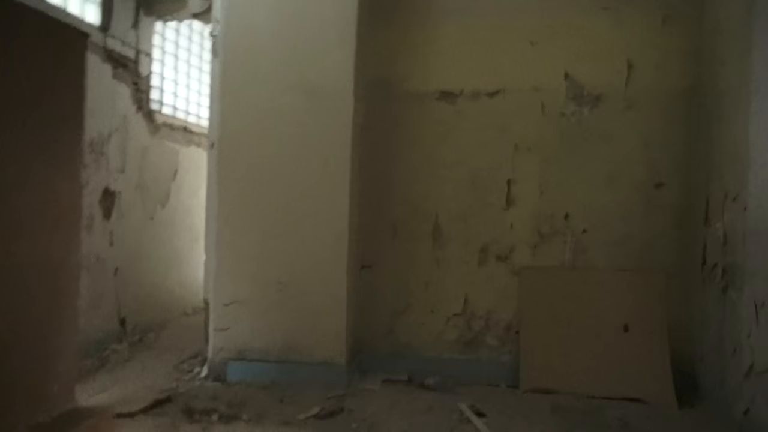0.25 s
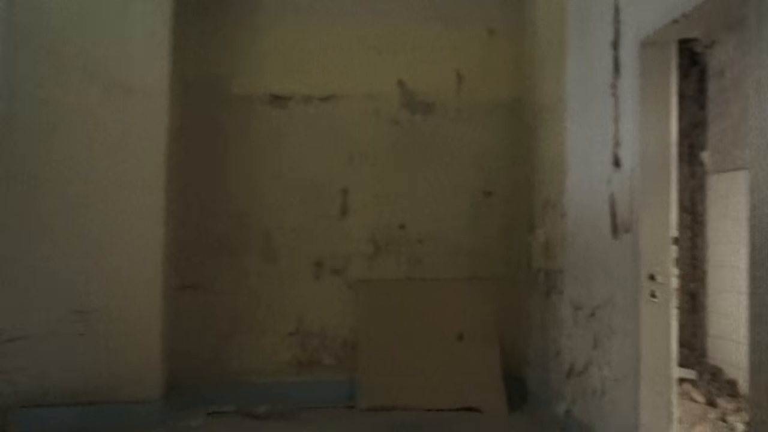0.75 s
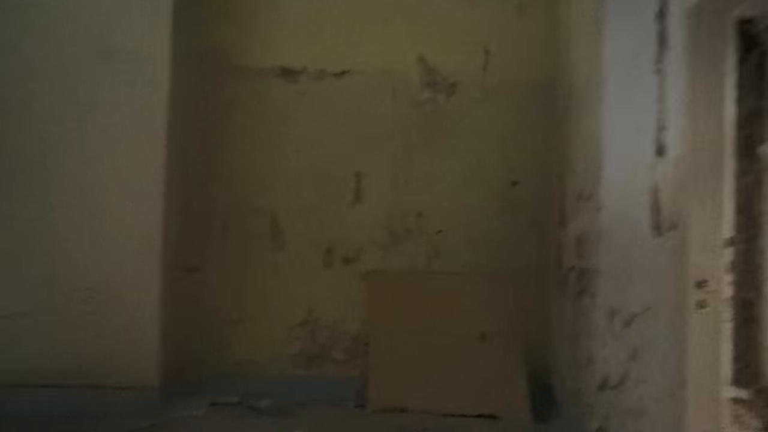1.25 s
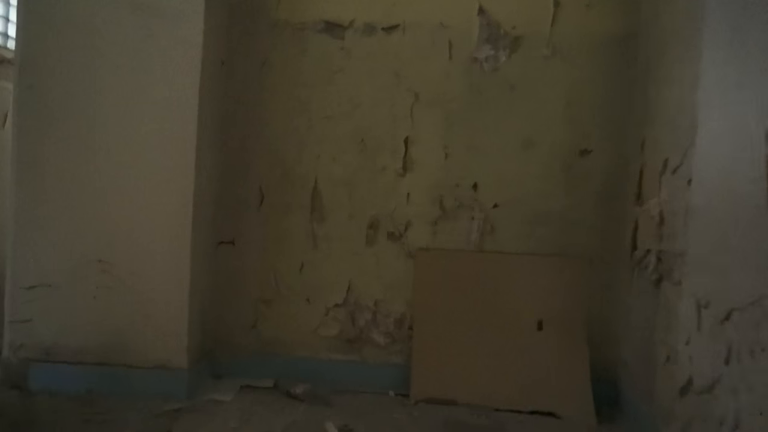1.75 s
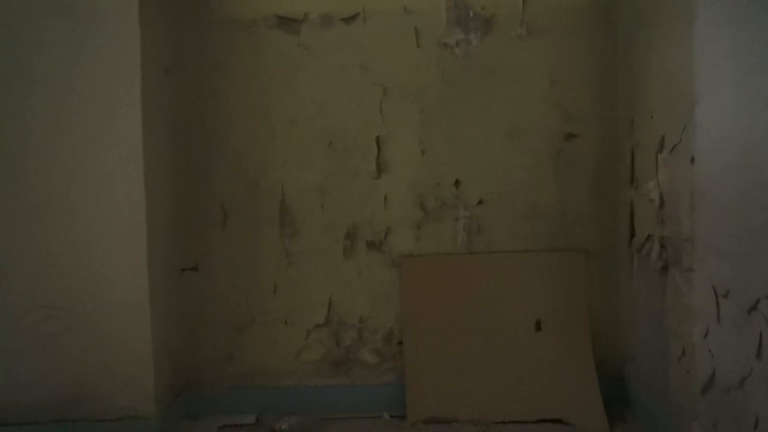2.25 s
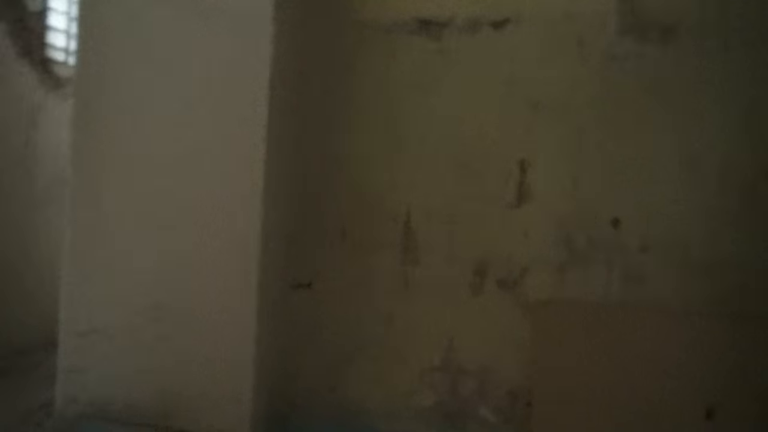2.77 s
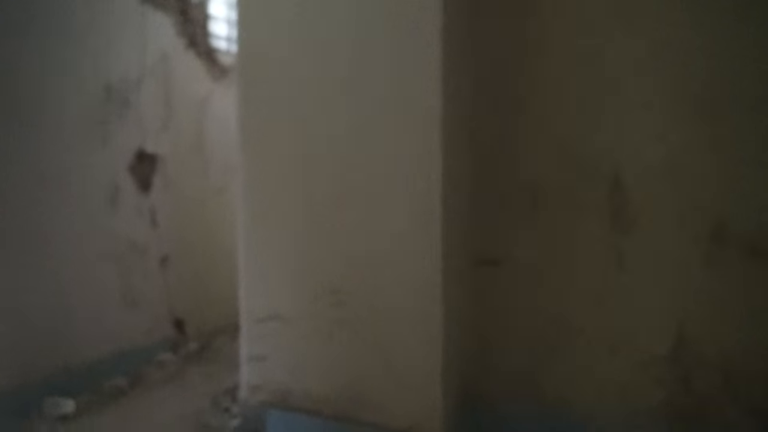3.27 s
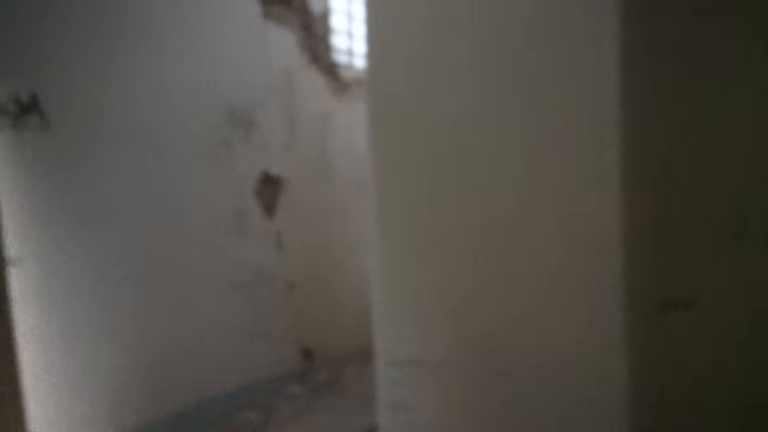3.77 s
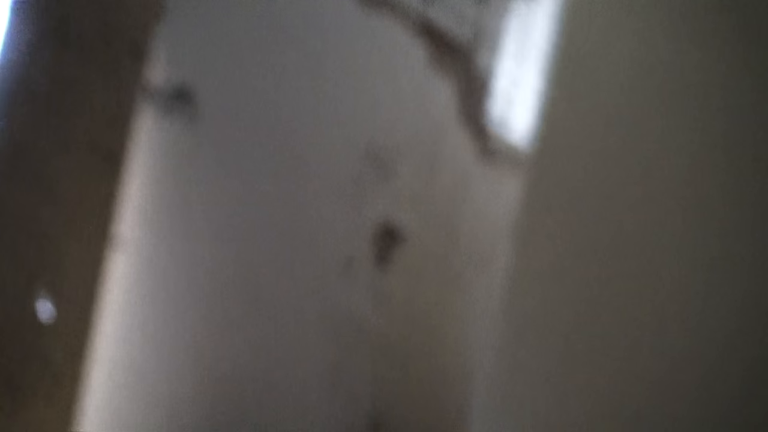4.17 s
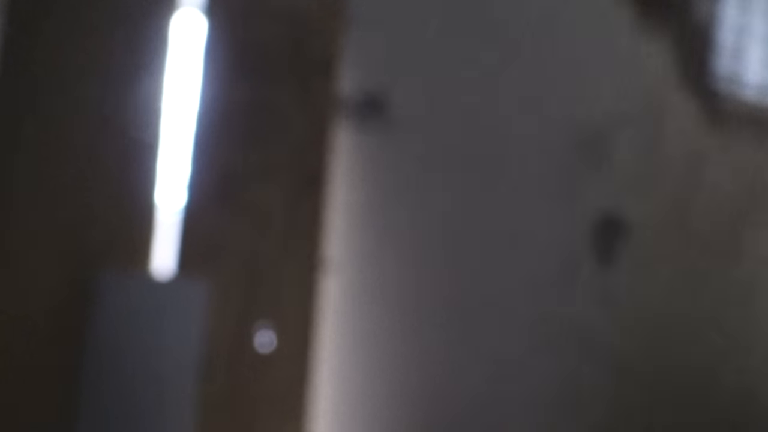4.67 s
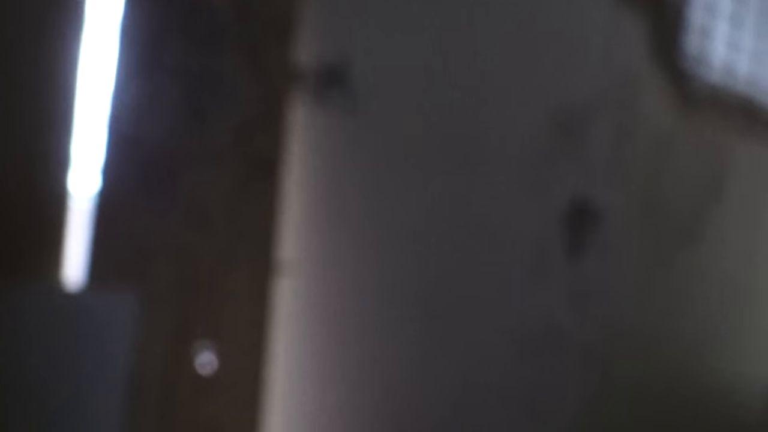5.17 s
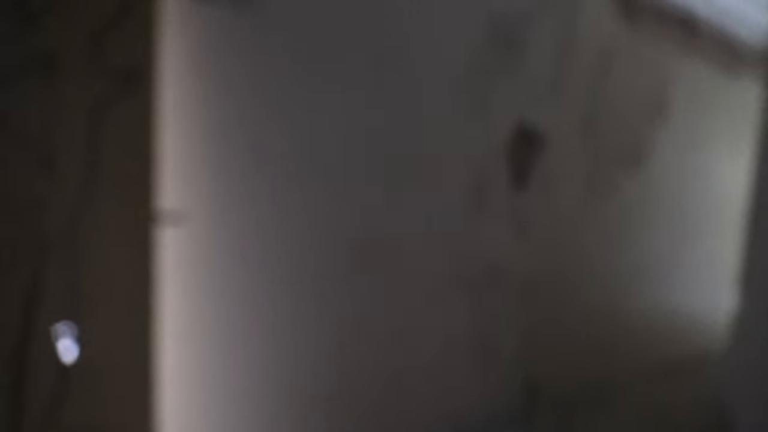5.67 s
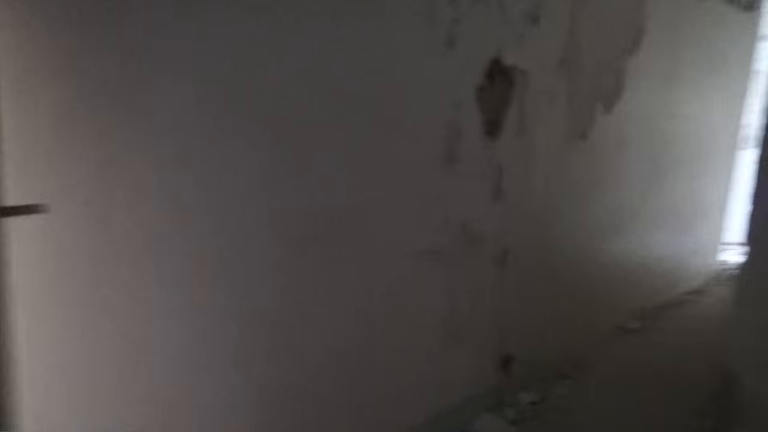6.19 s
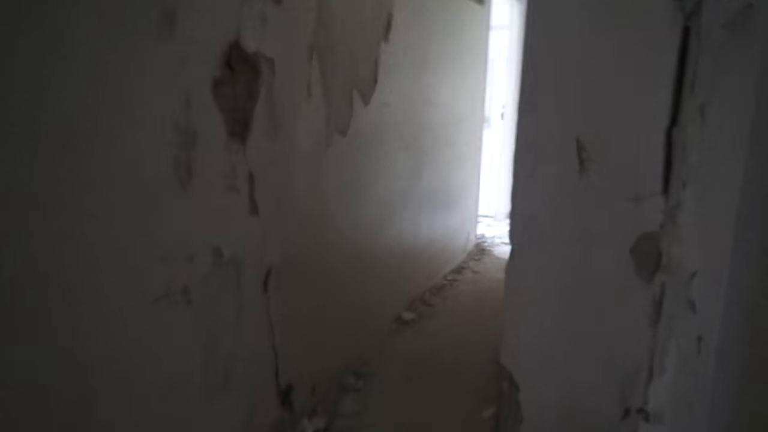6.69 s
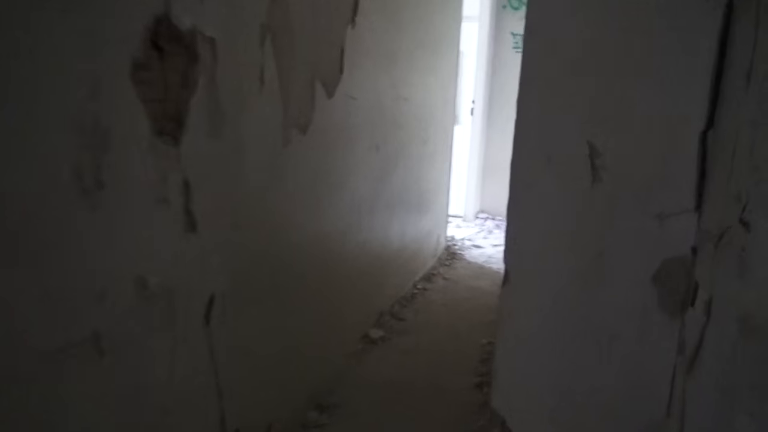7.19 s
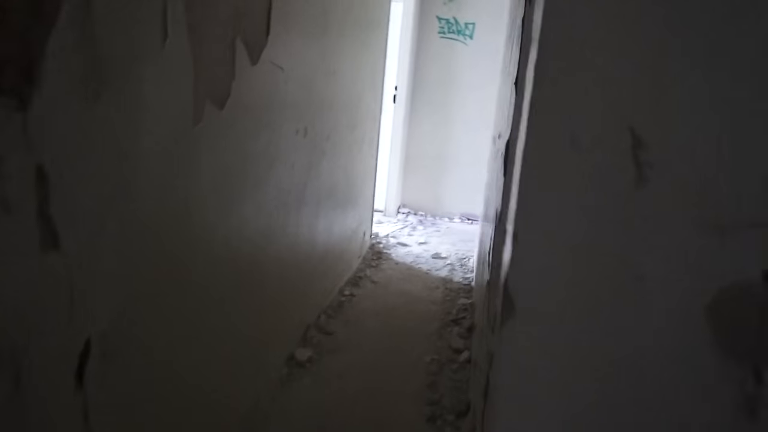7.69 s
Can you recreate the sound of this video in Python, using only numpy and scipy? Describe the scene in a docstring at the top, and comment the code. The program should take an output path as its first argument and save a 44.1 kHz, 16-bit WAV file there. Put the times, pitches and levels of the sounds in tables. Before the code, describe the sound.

Slow footsteps cross plaster rubble in an empty building, with a short echo from bare walls, soft clothing rustle and a faint hiss. A scuffing step opens, followed by light crunches and small snaps around 1, 1.7 and 2.5 seconds. A loud, dry plastic click on the camera body sounds right at the microphone at 1.9 seconds, with two smaller ones just before 3. At about 3.4 seconds a sole crushes plaster in the loudest burst of cracking, then crackles and slides over sand from 4 to 4.3. Quieter steps and tiny ticks follow, until another loud camera click at 5.9 seconds. Gritty steps and scrapes run from 6 to 6.8 seconds, when a foot knocks a hollow piece that rocks for a moment. A last soft crunch comes around 7.6 seconds.

```python
"""Slow steps over rubble

A person with a small camera walks slowly over plaster rubble and grit in an empty building.
Soles thud, scuff and crush grit, pieces snap, a foot knocks a hollow piece, and clothes rustle.
Bare walls echo the floor sounds, while ticks on the camera body stay close and nearly dry."""
import sys
import numpy as np
from scipy import signal
from scipy.fft import rfft, irfft, next_fast_len
from scipy.io import wavfile

SR = 44100
rng = np.random.default_rng(int(sys.argv[2]) if len(sys.argv) > 2 else 0)


def to_wav(sig):
    """Store sig (one row per channel, or 1-D mono) as 16-bit WAV at the path in sys.argv[1].

    Samples outside -1..1 are clipped; the rate is SR.
    """
    pcm = np.clip(np.atleast_2d(sig), -1, 1) * 32767
    pcm = np.round(pcm).astype(np.int16)
    wavfile.write(sys.argv[1], SR, pcm.T)  # frames by channels


N = 350418

# a sole presses on the rubble: (peak time [s], rise [s], time from peak to lift [s], base fade [dB/s],
# crunch [dB], scuff [dB], rumble [dB], fine grit [dB])
STEPS = [(0.0, .05, 0.12, 33, -74.5, -88, -76, -65.5), (.143, 0.022, 0.057, 41, -64.5, -60, -78, -58.5),
         (.2, 0.13, .3, 35, -57.5, -58.5, -71.5, -56.5), (.894, 0.29, 0.023, 36.5, -75, -83, -82, -76.5),
         (1.004, 0.057, 0.25, 22.5, -60, -67.5, -73.5, -64),
         (1.439, 0.43, 0.009, 43.5, -68, -76, -73.5, -75), (1.765, 0.13, 0.33, 43, -57, -64, -72.5, -53.5),
         (2.1, 0.1, 0.011, 47, -66.5, -86.5, -70.5, -58),
         (2.283, 0.062, 0.0099, 67, -70.5, -87, -87, -62.5), (2.48, 0.16, 0.025, 20, -68.5, -80, -112, -70),
         (2.546, 0.036, 0.33, 43, -54, -60, -84, -57), (2.79, 0.25, 0.1, 86, -66.5, -74, -73.5, -68.5),
         (2.938, 0.037, 0.014, 46, -79, -68.5, -66.5, -94), (3.135, 0.32, 0.0055, 48, -66, -88, -93, -63.5),
         (3.26, 0.043, 0.091, -5, -68, -53, -60, -62), (3.388, 0.13, 0.38, 83, -44, -52.5, -63.5, -39),
         (3.8, 0.5, 0.088, 13, -65.5, -71.5, -72, -73), (3.938, 0.11, 0.019, 35, -73, -64, -68, -59.5),
         (4.069, 0.0085, 0.014, 38, -55.5, -62.5, -55.5, -62), (4.21, 0.27, 0.3, 59, -55, -69, -66, -52.5),
         (4.6, 0.77, 0.13, 35, -73.5, -99, -91, -70), (4.86, 0.23, 0.32, 46, -63, -67.5, -72, -69),
         (5.34, 0.12, 0.17, 59, -69, -84, -90, -64), (5.597, 0.044, 0.69, 46, -59.5, -59, -70.5, -67.5),
         (6.105, 0.011, 0.13, 34, -61.5, -67, -61.5, -61),
         (6.165, 0.022, 0.255, 11.5, -57.5, -61.5, -66.5, -59),
         (6.465, 0.07, 0.28, 13, -55, -63.5, -68, -58), (6.805, 0.11, 0.018, 56, -50, -59.5, -67, -59),
         (6.856, 0.015, .15, 87, -52, -46.5, -77, -69), (7.309, 0.032, 0.24, -3, -75, -77.5, -89, -83.5),
         (7.555, 0.048, 0.071, 53, -52, -56.5, -65.5, -57), (7.661, 0.05, 0.3, 53, -62.5, -63.5, -71, -68)]
# how fast crunch, scuff, rumble and fine grit fade: (multiple of the base fade)
FADE_FACTORS = [1.3, 1.63, 0.73, 1.85]
# what is left of the same four between steps: (level [dB])
REST_DB = [-90.5, -83, -83.5, -100]
# tone of breaking grit: (frequency [Hz], level [dB])
GRIT_TONE = [(410, -38), (700, -15), (1650, 9.5), (1810, 8), (2390, 5.5), (3370, 2), (4170, -2),
             (6390, -10.5), (9000, -18), (11700, -42), (19800, -120)]
# heels landing: (time [s], level [dB], pitch [Hz])
HEELS = [(0.137, -61, 410), (0.18, -43.5, 840), (0.2185, -42.5, 620), (0.241, -47.5, 600),
         (0.972, -54, 304), (1.909, -55.5, 167), (3.04, -61, 196), (3.233, -50.5, 288), (3.28, -57.5, 92),
         (3.822, -48, 456), (4.057, -51.5, 148), (4.1, -58, 62), (4.277, -55, 101), (4.999, -60.5, 74),
         (5.339, -63.5, 172), (5.549, -59.5, 397), (5.577, -47.5, 504), (5.596, -48.5, 490),
         (6.1, -53, 356), (6.348, -48.5, 502)]
# rubble snapping, and a short click at 0.5 s: (time [s], level [dB], pitch [Hz], noise over ring [dB])
SNAPS = [(0.501, -43.5, 1840, -8), (1.009, -45.5, 3100, -19), (1.235, -43, 1680, -29.5),
         (1.728, -38.5, 8100, -18), (1.742, -38.5, 5230, 5), (1.754, -34, 7550, -9), (1.777, -35, 7000, -3),
         (2.095, -47.5, 3100, -2), (2.524, -40, 1050, -21), (2.751, -45, 1870, -3),
         (3.258, -42.5, 1800, -25), (3.272, -34, 3700, -20), (3.283, -31, 5660, -20),
         (3.32, -25.5, 3400, -10), (3.352, -29, 5650, -9), (3.361, -31, 1260, -15),
         (3.387, -16.5, 3200, -4.5), (3.394, -25, 5600, -8), (3.398, -25, 9500, -2),
         (3.4015, -24.5, 3280, -22), (3.4066, -20.5, 6460, -4), (3.413, -25, 6200, -9),
         (3.914, -40.5, 800, 4.5), (3.932, -44, 9000, -10), (3.963, -43, 2000, -10),
         (4.051, -44.5, 1840, 2), (4.069, -34, 1780, 1), (4.09, -37, 1870, -11), (4.104, -38.5, 5040, -2),
         (4.109, -34, 2300, -5), (4.153, -34, 2050, -7), (4.161, -39, 2600, -8), (4.171, -41, 2300, -5),
         (4.188, -39, 2320, -6), (4.197, -40, 2390, -17), (4.278, -36, 1760, 3), (4.331, -39, 1720, -8.5),
         (4.622, -47.5, 2960, -22), (4.932, -46, 2870, -8), (5.63, -41, 2570, -18),
         (5.7265, -45.5, 994, -19), (5.74, -47.5, 950, -19), (6.112, -43.5, 1690, 0),
         (6.159, -37, 3450, -22), (6.213, -36.5, 2720, -5), (6.272, -41, 11400, -25),
         (6.29, -40.5, 1780, -11), (6.397, -48, 2440, -19), (6.457, -37, 2630, -16),
         (6.5074, -32, 2800, -6), (6.519, -37, 2390, -8), (6.751, -35.5, 8500, -25),
         (6.795, -34.5, 1460, -11.5), (6.85, -37, 2400, -14), (7.544, -45, 2270, -10),
         (7.678, -38.5, 6430, 0)]
# a sole slides over sand: (peak time [s], rise [s], fall [s], level [dB])
RASPS = [(2.56, 0.1, 0.099, -55.5), (3.42, 0.079, 0.15, -53), (4.2, 0.075, 0.12, -48.5),
         (5.34, 0.12, 0.12, -60), (6.2, 0.24, 0.33, -61.5), (6.5, 0.2, 0.16, -54.5)]
# chips dragged along the floor: (start [s], end [s], pitch [Hz], level [dB])
SCRAPES = [(-.1, 0.155, 3180, -71.5), (-.1, .15, 4540, -76), (0.868, 0.964, 2400, -81),
           (3.112, 3.155, 1860, -64.5), (3.268, 3.311, 3730, -51), (3.267, 3.306, 5700, -51.5),
           (5.074, 5.266, 1333, -70), (6.45, 6.73, 5500, -61)]
# the hollow piece is knocked and rocks: (time [s], strength [dB])
KNOCKS = [(6.849, -30.5), (6.888, -45), (6.913, -36.5), (6.955, -43.5), (7.0, -53)]
# the hollow piece's tones: (pitch [Hz], level [dB], time to fade by 60 dB [s])
HOLLOW_TONES = [(244.6, -25, 0.2), (252.4, -18, 0.3), (464, -10.5, 0.22), (481, -8.5, 0.19),
                (624, -15, 0.17), (985, -17.5, 0.11), (1029, -15, 0.062), (1190, -12, 0.032),
                (1815, -12.5, 0.041)]
# ticks on the camera: (time [s], level [dB], pitch [Hz], noise over ring [dB], noise centre [Hz],
# ring time [s])
TICKS = [(0.879, -53, 2320, -8, 7000, 0.014), (1.56, -47, 1830, 7, 5900, 0.012),
         (1.672, -47, 1510, -6, 4500, 0.016), (1.678, -47, 7760, -7, 8000, 0.012),
         (1.9096, -14, 5900, 5.5, 10100, 0.015), (2.397, -50, 1810, -30, 7000, 0.035),
         (2.454, -45.5, 2430, -9, 6000, 0.015), (2.771, -28.5, 1850, -2.5, 5100, 0.011),
         (2.898, -59, 6000, 1, 7000, 0.008), (2.917, -58, 7000, 2, 7000, 0.0074),
         (2.97, -22, 1920, -4.5, 2700, 0.016), (3.205, -54, 1780, -20, 5030, .014),
         (3.226, -50, 8840, 3, 8000, 0.008), (3.644, -49, 6960, -3, 8000, 0.008),
         (3.663, -48, 6310, 4, 7500, 0.014), (3.736, -50, 9250, 10, 7500, 0.008),
         (3.756, -47.5, 3270, 4, 6000, 0.008), (3.782, -59, 4500, -8, 6000, .01),
         (3.846, -52, 3320, -7, 7000, 0.0088), (3.99, -53, 1800, -13, 7000, 0.012),
         (4.956, -39.5, 2920, -6.5, 7000, 0.0035), (4.983, -40.5, 1710, -18, 7000, 0.021),
         (5.099, -60, 1480, -12, 7000, 0.015), (5.128, -51.5, 1960, -13.5, 7000, 0.013),
         (5.179, -51, 1500, -7, 7000, 0.012), (5.2, -56, 2720, -2, 7040, 0.012),
         (5.261, -51.5, 1800, -16.5, 6950, 0.014), (5.8847, -13.5, 4900, 8.5, 7300, 0.02),
         (7.042, -55, 2500, -14, 5950, 0.0075), (7.304, -50, 1790, -21, 3450, 0.016),
         (7.319, -55.5, 1790, -33.5, 7100, 0.022)]
# the camera shell's tones: (pitch [Hz], level [dB], ring time [s])
SHELL_TONES = [(1270, -39, 0.022), (1800, -11.5, 0.026), (2630, -30.5, 0.016), (3480, -12.5, 0.016),
               (3940, -21.5, 0.016), (7600, -24.5, 0.019)]
# clothes brushing, and brief bright hiss at a few snaps and ticks:
# (peak time [s], rise [s], fall [s], level [dB])
SWISHES = [(.3, 0.097, 0.28, -52), (.52, 0.058, 0.14, -63.5), (1.405, 0.026, 0.14, -62.5),
           (2.21, 0.1, 0.018, -61.5), (2.35, 0.1, 0.04, -66), (3.33, 0.06, .1, -42),
           (3.655, 0.046, 0.22, -63), (4.28, 0.018, 0.027, -55), (4.78, 0.016, .1, -65.5),
           (4.96, .04, 0.064, -65), (4.825, 0.045, 0.17, -59), (5.635, 0.15, 0.25, -59.5),
           (5.79, .04, 0.095, -64), (5.835, 0.052, .06, -64), (6.6, 0.18, 0.5, -53.5),
           (6.88, 0.13, .1, -63.5), (1.705, 0.027, .04, -68), (7.685, 0.021, 0.088, -55)]
# tone of cloth, fine grit and bright hiss: (frequency [Hz], level [dB])
RUSTLE_TONE = [(2060, -11), (3500, 1.5), (3750, -8), (4370, -2.5), (5900, -1.5), (11500, -5.5),
               (14100, -10.5), (16000, -29)]
# the building's echo: (frequency [Hz], time to fade by 60 dB [s])
HALL_FADE = [(100, 0.43), (500, 1), (2000, 0.76), (6000, 0.73), (14000, 0.3)]
# tone of still air and microphone hiss: (frequency [Hz], level [dB])
AIR_TONE = [(15, -22.5), (25, 8.5), (172, 3.5), (309, -3.5), (952, -2), (1760, 0.5), (2500, -19.5),
            (3090, -3), (3830, -13.5), (7000, -19), (12100, -25.5), (15000, -22.5)]
# stereo width: (frequency [Hz], gain of the side signal [dB])
WIDTH = [(60, -18.5), (130, -14.5), (260, -18), (500, -16), (2000, -21), (4500, -24.5), (7000, -5),
         (10000, -9.5), (14000, -20)]
# stereo balance: (frequency [Hz], left over right [dB])
BALANCE = [(60, 2.4), (250, 1.2), (1000, 0.1), (4000, 0.1), (8000, 1.2)]

SWELL_DB, LIFT_DB_PER_S = 28.5, 220.5   # change over one rise or fall; extra fade once a sole lifts
PATTER_DB, PATTER_FADE_S = -18.5, 0.25
SHELL_DB_PER_OCTAVE = -1.5   # brighter ticks ring the shell less
CRACKLE_S, CRACKLE_S_PER_DB = 0.013, 0.04   # the loudest ticks crackle longest
HALL_DB, AIR_DB = -7.5, -74
ECHO_DB, ECHO_FADE_S = -36, 0.41
TOP_HZ = 16100


def crunch(level_db):
    """Grit grains break one by one, each ringing briefly; the mix of sizes keeps changing."""
    clicks = grains(per_s=2200, uneven_db=3.0)
    grain_size = rng.integers(0, 18, N)
    rings = 0
    for k, hz in enumerate(np.geomspace(800, 8500, 18)):
        share = amp(at_hz(GRIT_TONE, hz) + 3.3 * drift(8.0))
        rings = rings + hz * ring(share * clicks * (grain_size == k), hz, 17.0 / hz)
    return amp(level_db) * unit(rings)


def sole(scuff_db, rumble_db):
    """The sole drags in coarse slips; the weight shifts with a low rumble."""
    scuff = band(grains(per_s=1500, uneven_db=4.0), 382, 1100)
    rumble = band(band(grains(per_s=1300, uneven_db=3.0), 110, 299), 60, 440)
    return amp(scuff_db) * unit(scuff) + amp(rumble_db) * unit(rumble)


def footsteps():
    """Each step swells and fades: four power curves, for crunch, scuff, rumble and fine grit."""
    powers = []
    for k, (factor, rest_db) in enumerate(zip(FADE_FACTORS, REST_DB)):
        steps = sum(amp(levels[k]) ** 2 * swell(peak, rise, factor * fade, lift)
                    for peak, rise, lift, fade, *levels in STEPS)
        powers.append(amp(rest_db) ** 2 + steps)
    return powers


def heels():
    """A soft push rings the floor under the heel for a few cycles."""
    out, push = np.zeros(N), np.pad(np.hanning(60), (0, 6000))
    for s, db, hz in HEELS:
        thump = band(ring(push, hz, min(27.0 / hz, .12)), 51, 2000)
        add(out, s, amp(db) * thump / np.abs(thump).max())
    return out


def plaster_snaps():
    """Plaster breaks and barely rings: one short tone with four random ones around it."""
    out = np.zeros(N)
    noises = rng.standard_normal((len(SNAPS), 1500))
    ratios = rng.uniform(0.6, 1.7, (len(SNAPS), 4))
    for (s, db, hz, noise_db), noise, ratio in zip(SNAPS, noises, ratios):
        tones = [(hz * r, -6, .004) for r in ratio]
        snap = crack(noise, hz, noise_db, np.sqrt(hz * 8000), tones,
                     ring_s=0.0072, crackle_s=0.0072, first_hit=4.0)
        add(out, s, amp(db) * snap)
    return out


def crack(noise, hz, noise_db, noise_hz, extra_tones, ring_s, crackle_s, first_hit):
    """One hit and a burst of smaller ones ring a cluster of tones and spray noise; peak 1."""
    t = np.arange(len(noise)) / SR
    hits = (noise ** 3 + first_hit * (t == 0)) * amp(-60 * np.maximum(t / crackle_s - .12, 0))
    tone = ring(hits, hz, ring_s) + .6 * ring(hits, hz * 1.045, ring_s)
    tone += 0.41 * ring(hits, hz * 1.3, ring_s * 0.65)
    tone += sum(amp(db) * ring(hits, pitch, fade_s) for pitch, db, fade_s in extra_tones)
    tone = band(tone, 780, TOP_HZ)
    spray = noise * amp(-60 * np.maximum(t / crackle_s - .1, 0)) * np.minimum(t / 0.00034, 1)
    spray = band(spray, noise_hz / 2.33, min(noise_hz * 2.33, TOP_HZ))
    sound = tone / np.abs(tone).max() + amp(noise_db) * spray / np.abs(spray).max()
    return sound / np.abs(sound).max()


def sand_rasp():
    """Sand under a sliding sole: dense grains in one band."""
    sand = band(band(grains(per_s=3400, uneven_db=2.0), 2000, 3300), 1800, 3600)
    return amp(level(strokes(RASPS) + 1e-14)) * unit(sand)


def chip_scrapes():
    """Each dragged chip sings in one narrow band."""
    out, t = 0, np.arange(N) / SR
    for start, end, hz, db in SCRAPES:
        progress = np.clip((t - start) / (end - start), 0, 1)
        singing = unit(ring(rng.standard_normal(N), hz, 31.0 / hz))
        out = out + amp(db) * np.sin(np.pi * progress) ** .5 * singing
    return out


def hollow_piece():
    """Each knock, and the grit pattering after it, rings every tone of the piece by a different amount."""
    out, t = np.zeros(N), np.arange(SR // 2) / SR
    chance_db = rng.normal(0, 2.5, (len(KNOCKS), len(HOLLOW_TONES)))
    for k, (hz, tone_db, ring_s) in enumerate(HOLLOW_TONES):
        hits = np.zeros(N)
        for (s, db), extra_db in zip(KNOCKS, chance_db[:, k]):
            patter = amp(PATTER_DB - 60 * t / PATTER_FADE_S) * rng.standard_normal(len(t))
            patter *= rng.random(len(t)) < 900 / SR   # about 900 grains a second
            add(hits, s, amp(db + tone_db + extra_db) * ((t == 0) + patter))
        out += ring(hits, hz, ring_s)
    return band(band(out, 242, 3200), 238, 3200)


def camera_ticks():
    """Plastic parts click right at the microphone and ring the camera's shell."""
    out = np.zeros(N)
    noises = rng.standard_normal((len(TICKS), 2500))
    chance_db = rng.normal(0, 3.0, (len(TICKS), len(SHELL_TONES)))
    for (s, db, hz, noise_db, noise_hz, ring_s), noise, extras in zip(TICKS, noises, chance_db):
        tilt_db = SHELL_DB_PER_OCTAVE * np.log2(hz / 2000)
        shell = [(pitch, tone_db + extra_db + tilt_db, fade_s)
                 for (pitch, tone_db, fade_s), extra_db in zip(SHELL_TONES, extras)]
        crackle_s = max(CRACKLE_S + CRACKLE_S_PER_DB * (db + 14), .003)
        tick = crack(noise, hz, noise_db, noise_hz, shell, ring_s, crackle_s, first_hit=14.0)
        add(out, s, amp(db) * tick)
    return band(band(out, 1050, TOP_HZ), 1000, TOP_HZ)


def rustle(level_db):
    """Cloth, fine grit and the hiss of a few snaps and ticks: tiny clicks in bands that swell apart."""
    hiss, edges = 0, np.geomspace(2500, 16000, 15)
    for low, high in zip(edges, edges[1:]):
        hiss = hiss + amp(3.8 * drift(14.0)) * band(grains(per_s=3200, uneven_db=4.5), low, high)
    return amp(level_db) * unit(colour(hiss, RUSTLE_TONE))


def hall(x):
    """Bare walls add a dense echo that dies fastest in the high treble."""
    t, tail = np.arange(SR) / SR, 0
    edges = np.geomspace(50, 16000, 13)
    for low, high in zip(edges, edges[1:]):
        decay = amp(-60 * t / at_hz(HALL_FADE, np.sqrt(low * high)))
        tail = tail + band(rng.standard_normal(len(t)), low, high) * decay
    tail = tail * np.clip(t / 0.0039 - .4, 0, 1)   # silent until the first bounce
    return signal.fftconvolve(x, tail / np.sqrt(np.sum(tail ** 2)))[:N]


def tick_echoes():
    """The near walls send each tick back as a bright puff that dies quickly."""
    out, t = np.zeros(N), np.arange(SR // 4) / SR
    for s, db, *_ in TICKS:
        add(out, s, amp(db + ECHO_DB - 60 * t / ECHO_FADE_S) * rng.standard_normal(len(t)))
    return band(out, 1400, 11000)


def air():
    """The still air of the building and the microphone hiss."""
    return amp(AIR_DB) * unit(colour(rng.standard_normal(N), AIR_TONE))


def stereo_microphone(direct, room, room_across):
    """Two close openings differ only a little: by shifted direct sound and room sound crossing them."""
    shifted = np.imag(signal.hilbert(direct, next_fast_len(N)))[:N]   # by a quarter cycle
    mid, side = direct + room, colour(shifted + room_across, WIDTH)
    left = colour(mid + side, [(hz, db / 2) for hz, db in BALANCE])
    right = colour(mid - side, [(hz, -db / 2) for hz, db in BALANCE])
    return np.array([left, right])


def swell(peak_s, rise_s, fade_db_per_s, lift_s=9.0):
    """Power of one swell, every 64 samples: it rises, fades, then drops fast after the lift."""
    t = np.arange(0, N + 64, 64) / SR - peak_s
    fall_db = fade_db_per_s * np.maximum(t, 0) + LIFT_DB_PER_S * np.maximum(t - lift_s, 0)
    return amp(SWELL_DB * np.minimum(t, 0) / rise_s - fall_db) ** 2


def strokes(rows):
    """Summed power of sounds that swell and fall away."""
    return sum(amp(db) ** 2 * swell(s, rise, SWELL_DB / fall) for s, rise, fall, db in rows)


def level(power):
    """Turn a power curve into decibels for every sample."""
    return np.interp(np.arange(N) / 64, np.arange(len(power)), 10 * np.log10(power))


def grains(per_s, uneven_db):
    """Random clicks of uneven size."""
    sizes = amp(uneven_db * np.minimum(rng.exponential(1, N), 4)) * rng.choice([-1, 1], N)
    return unit(sizes * (rng.random(N) < per_s / SR))


def drift(per_s):
    """A line that wanders between random values."""
    points = rng.standard_normal(int(N / SR * per_s) + 2)
    return np.interp(np.arange(N) / SR * per_s, np.arange(len(points)), points)


def ring(clicks, hz, ring_s):
    """Each click starts a pure tone that fades by 60 dB in ring_s."""
    decay, angle = amp(-60 / (ring_s * SR)), 2 * np.pi * min(hz, SR / 2.2) / SR
    return signal.lfilter([0, np.sin(angle)], [1, -2 * decay * np.cos(angle), decay ** 2], clicks + 1e-18)


def band(x, low_hz, high_hz):
    """Keep the sound between two frequencies."""
    return signal.sosfilt(signal.butter(2, [low_hz, high_hz], "band", fs=SR, output="sos"), x)


def colour(x, points):
    """Shape a sound's tone by a table of frequencies and levels."""
    size = next_fast_len(N)
    gain = amp(at_hz(points, np.fft.rfftfreq(size, 1 / SR)))
    return irfft(rfft(x, size) * gain, size)[:N]


def at_hz(points, hz):
    """Read between a table's rows on a log frequency scale."""
    freqs, values = np.array(points).T
    return np.interp(np.log(np.maximum(hz, 1)), np.log(freqs), values)


def add(out, s, sound):
    """Mix a short sound in at s seconds."""
    i = round(s * SR)
    out[i:i + len(sound)] += sound[:N - i]


def amp(db):
    """Decibels to gain."""
    return 10 ** (np.asarray(db) / 20)


def unit(x):
    """Scale to an average power of 1."""
    return x / np.sqrt(np.mean(x ** 2) + 1e-20)


def scene():
    """Floor sounds with their echo, close ticks and rustling, over the still air."""
    grit, scuff, rumble, fine_grit = footsteps()
    floor = crunch(level(grit)) + sole(level(scuff), level(rumble)) + sand_rasp() + heels()
    floor += plaster_snaps() + hollow_piece() + chip_scrapes()
    rustle_db = level(fine_grit + strokes(SWISHES))
    room, room_across = [amp(HALL_DB) * hall(floor) + rustle(rustle_db) + tick_echoes() + air()
                         for _ in range(2)]
    return stereo_microphone(floor + camera_ticks(), room, room_across)


def record(dry):
    """A steep filter cuts the highest treble."""
    return signal.sosfilt(signal.cheby2(14, 60, TOP_HZ + 300, fs=SR, output="sos"), dry)


dry = scene()
out = record(dry)
to_wav(out)
```